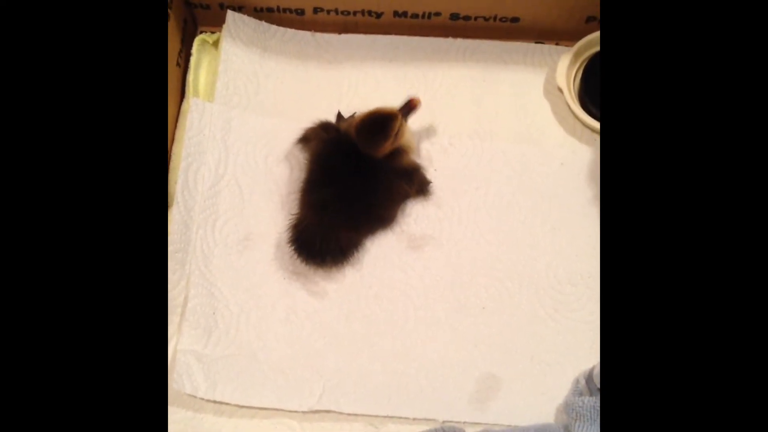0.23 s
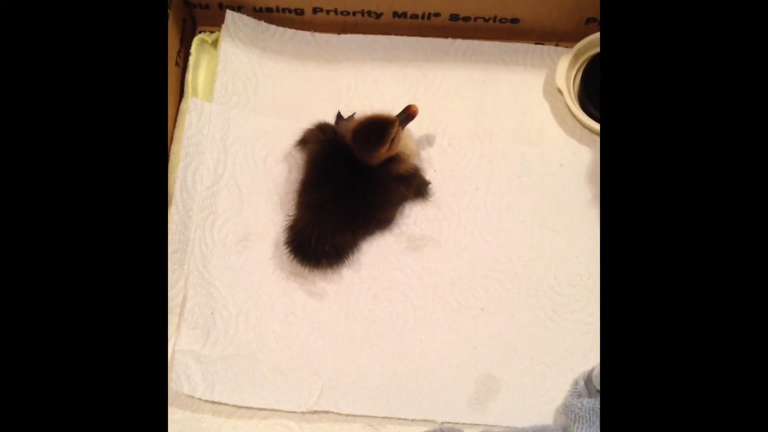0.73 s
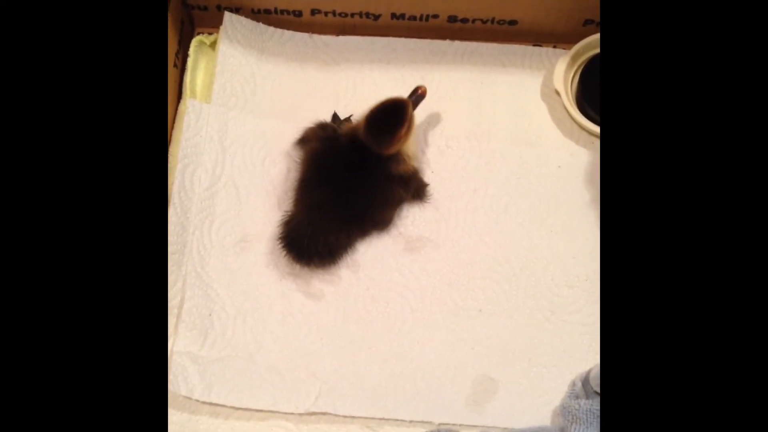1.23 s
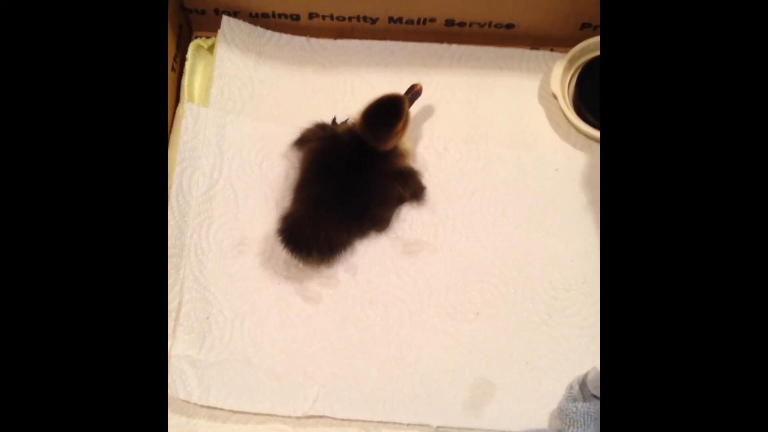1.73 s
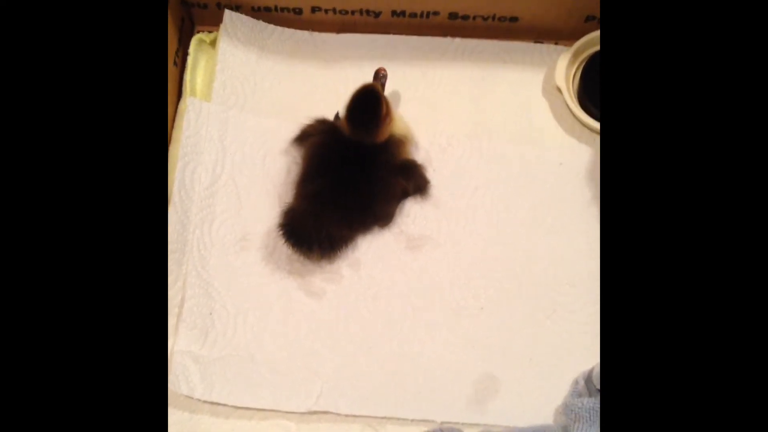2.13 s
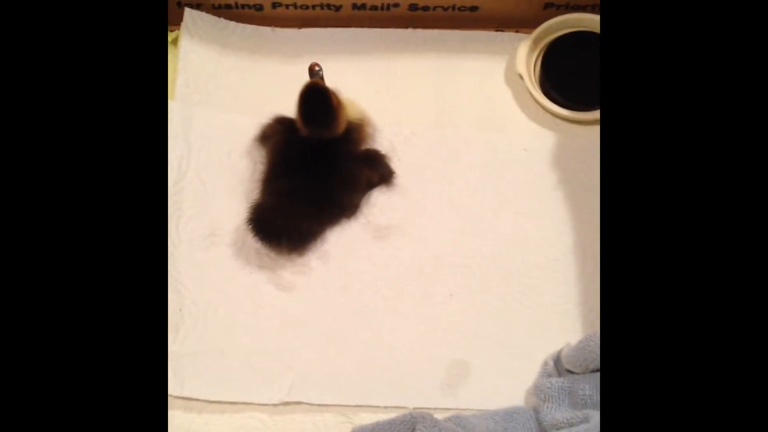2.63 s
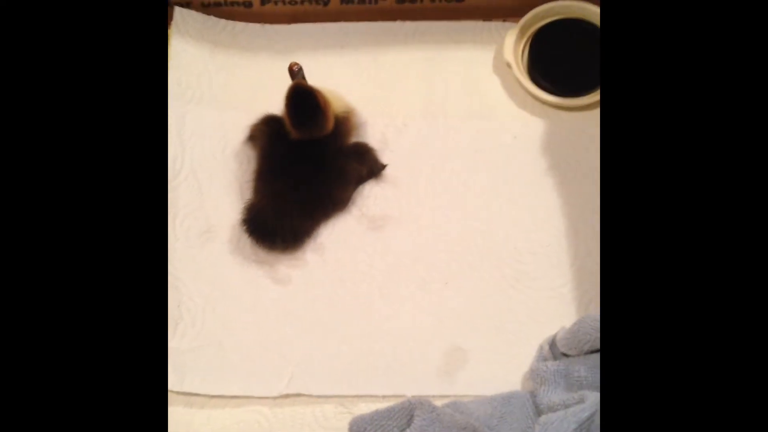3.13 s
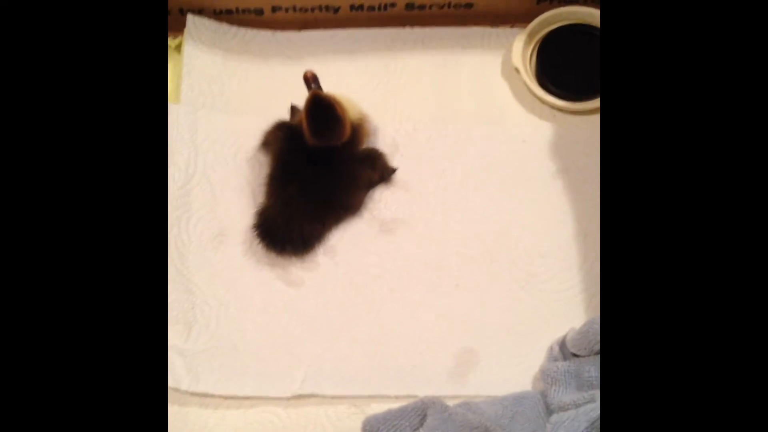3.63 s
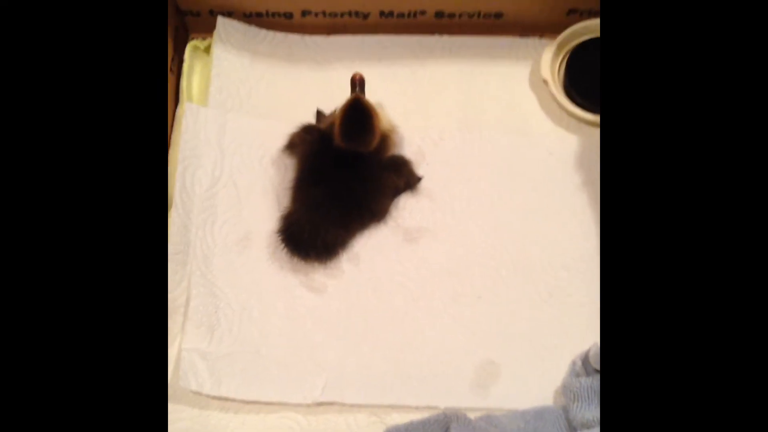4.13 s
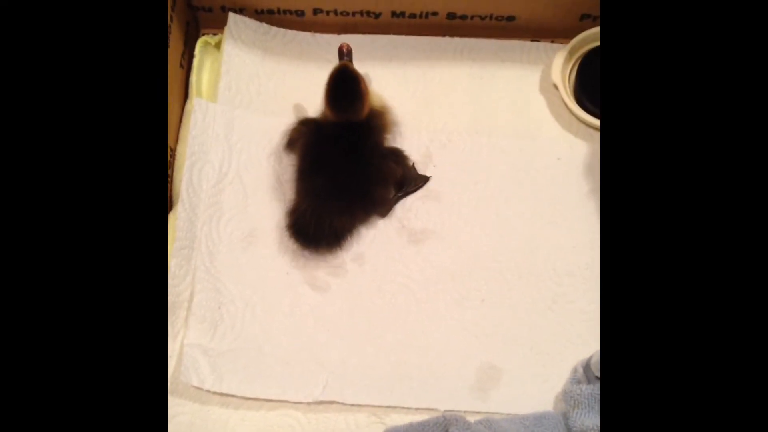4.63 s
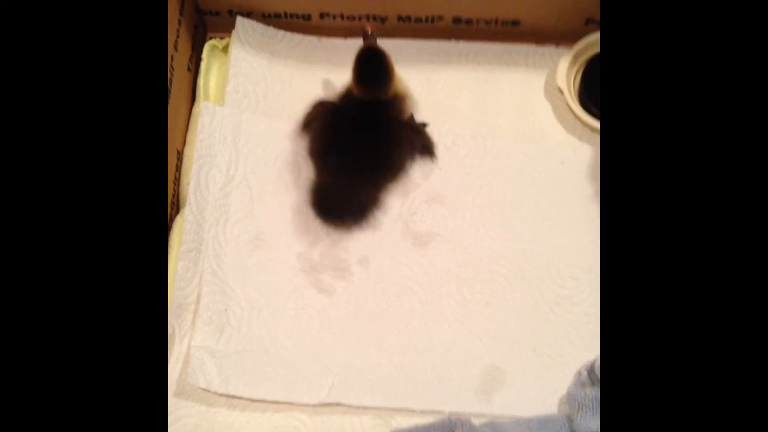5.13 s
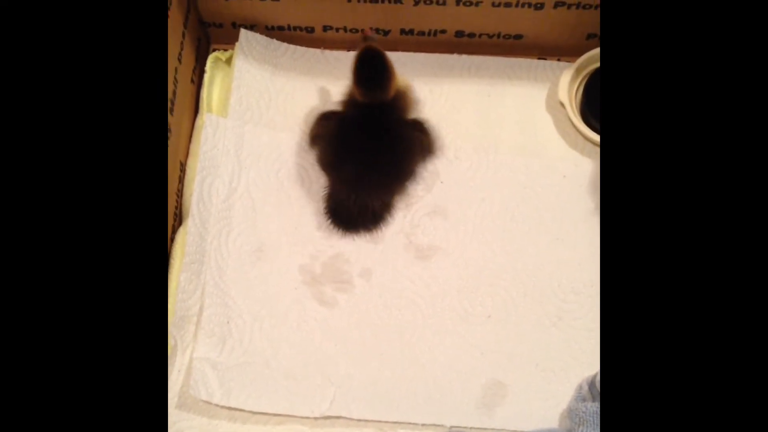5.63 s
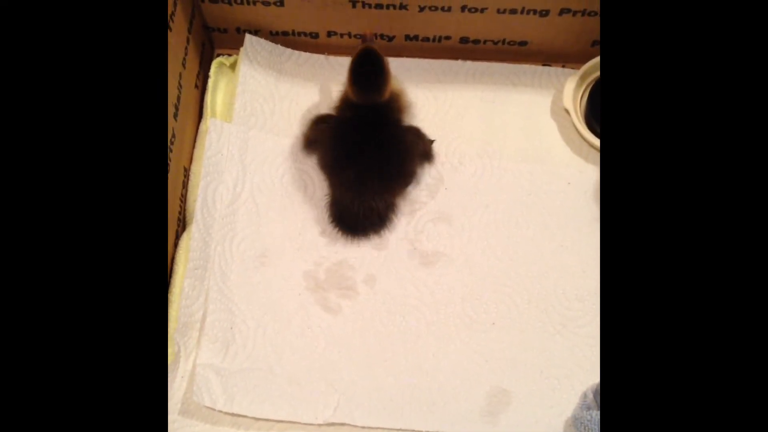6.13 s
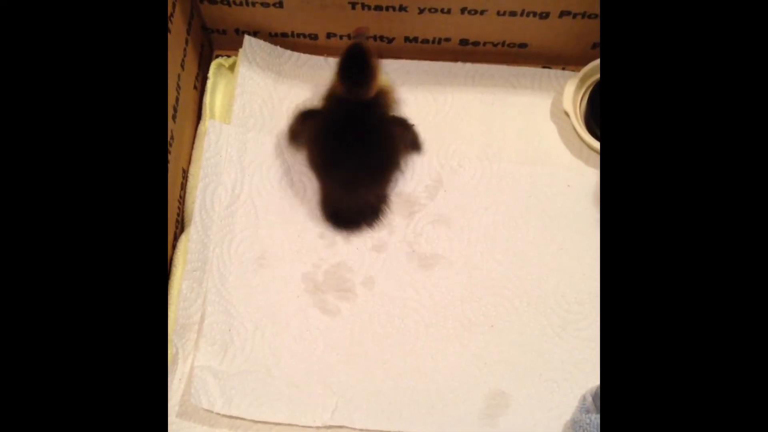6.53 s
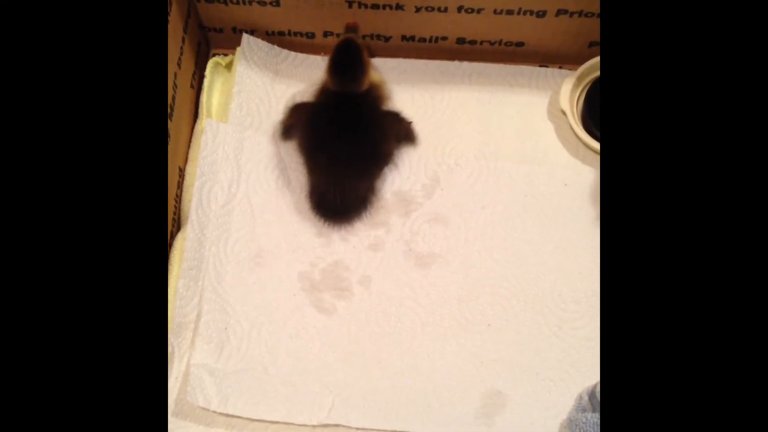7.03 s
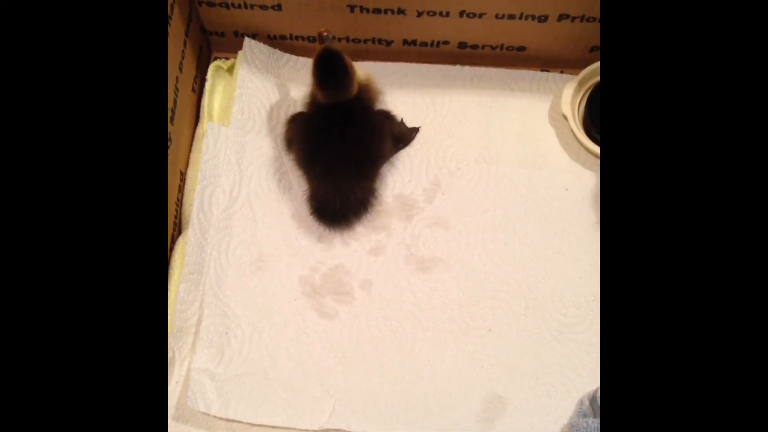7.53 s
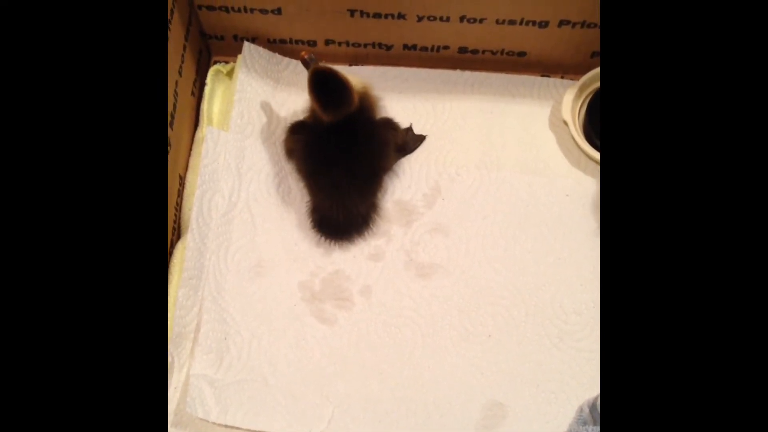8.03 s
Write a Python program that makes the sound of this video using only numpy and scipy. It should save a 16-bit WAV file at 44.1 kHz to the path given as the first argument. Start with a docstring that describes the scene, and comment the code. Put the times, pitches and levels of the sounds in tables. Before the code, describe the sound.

One duckling in a paper-lined box, heard closely from above in a quiet room. It opens with a gritty burst and a pair of fast cheeps, falls silent, then gives a dozen brief, high, pure peeps, many with a double bend in pitch. Light foot scuffs, crisp paper crackles and three small ticks appear mostly in the second half, over faint low hum, rumble and hiss.

```python
"""A quiet room: a duckling peeps in a paper-lined cardboard box, heard from close above.
A harsh rasp of ringing noise grains and two quick cheeps open it; a dozen peeps follow, most with two
pitch humps, all gliding near-pure tones. Scuffs are swells of noise grains, claw ticks short rings.
Echoes and a short tail follow each sound; a beating hum, rumble and faint hiss lie under it."""
import sys
import numpy as np
from scipy import signal
from scipy.fft import rfft, irfft, next_fast_len
from scipy.io import wavfile

SR = 44100
rng = np.random.default_rng(int(sys.argv[2]) if len(sys.argv) > 2 else 0)


def output_pcm(signal):
    """Save a mono or channel-first signal as 16-bit PCM at the path in sys.argv[1].

    Samples are clipped to [-1, 1] before scaling.
    """
    pcm = np.clip(np.atleast_2d(signal).T, -1, 1) * 32767
    wavfile.write(sys.argv[1], SR, np.round(pcm).astype(np.int16))


N = 364707
TIME = np.arange(N) / SR


def from_db(db):
    """Decibels to gain."""
    return 10 ** (np.asarray(db) / 20)


def rms_one(x):
    """Scale to unit rms."""
    return x / np.sqrt(np.mean(x ** 2) + 1e-20)


def drift(rate_hz):
    """Slow unit-rms random curve: noise through a two-pole lowpass at SR / 8, interpolated to SR."""
    pole = np.exp(-16 * np.pi * rate_hz / SR)
    noise = rng.standard_normal(N // 8 + 4002)
    slow = signal.lfilter([1], [1, -2 * pole, pole * pole], noise)[4000:]  # skip the settling
    return np.interp(np.arange(N) / 8, np.arange(len(slow)), rms_one(slow))


def colour(x, spectrum):
    """Filter by a (frequency [Hz], relative level [dB]) outline; white noise keeps its power."""
    size = next_fast_len(N)
    hz, db = np.transpose(spectrum)
    bin_hz = np.maximum(np.arange(size // 2 + 1) * SR / size, 1)
    gain = rms_one(from_db(np.interp(np.log(bin_hz), np.log(hz), db)))
    return irfft(rfft(x, size) * gain, size)[:N]


def resonate(x, hz, width_hz):
    """Two-pole resonance with unit peak gain."""
    pole = np.exp(-np.pi * width_hz / SR)
    zeros = np.array([1, 0, -1]) * (1 - pole * pole) / 2
    return signal.lfilter(zeros, [1, -2 * pole * np.cos(2 * np.pi * hz / SR), pole * pole], x)


def grains(spread_db):
    """Unit-rms white noise in millisecond clumps."""
    return rms_one(rng.standard_normal(N) * from_db(spread_db * drift(300)))


def scattered(start_s, end_s, count):
    """One random moment in each equal share of a stretch of time."""
    return start_s + (end_s - start_s) * (np.arange(count) + rng.random(count)) / count


# room noise outline: (frequency [Hz], relative density [dB per Hz])
ROOM_TONE = [(15, -63), (25, -20), (55, -7.5), (112, -5.5), (147, -6), (198, -8.5), (258, -11.5),
             (288, -11.5), (338, -13), (479, -14.5), (913, -21), (1650, -22.5), (4220, -18), (7020, -20),
             (13700, -21), (15300, -22)]
ROOM_TONE_RMS_DB = -56.5
# soft swells of rumble: (start [s], length [s], level at the top [dB], centre [Hz], width [Hz])
RUMBLE_SWELLS = [(3.15, 0.5, -63, 54, 50), (3.98, 0.69, -66.5, 335, 224)]


def background():
    """Rumble and hiss: coloured white noise, plus two bands that swell as half sines."""
    air = from_db(ROOM_TONE_RMS_DB) * colour(rng.standard_normal(N), ROOM_TONE)
    for start_s, length_s, level_db, hz, width_hz in RUMBLE_SWELLS:
        band = resonate(rng.standard_normal(N), hz, width_hz)
        band = rms_one(resonate(band, hz, width_hz))
        swell = np.sin(np.pi * np.clip((TIME - start_s) / length_s, 0, 1))
        air += from_db(level_db) * swell * band
    return air


# stronger hum tone: (time [s], rms level [dB])
HUM_LEVEL = [(0.0, -76), (2.2, -71), (3.4, -66.5), (6.8, -69.5), (8.27, -73)]
HUM_HZ = 119.6
BEAT_S, BEAT_PEAK_S, SECOND_TONE_DB = 0.894, 3.424, -3.0
# fainter tones beside the hum: (frequency [Hz], rms level [dB])
HUM_LINES = [(96, -78), (193, -78)]


def hum(waver_hz=0.3, line_waver_hz=1.53):
    """Two close low tones beat; fainter wavering tones lie beside them."""
    phase = 2 * np.pi * np.cumsum(HUM_HZ + waver_hz * drift(1.49)) / SR
    slip = 2 * np.pi * (TIME - BEAT_PEAK_S) / BEAT_S
    pair = np.sin(phase) + from_db(SECOND_TONE_DB) * np.sin(phase + slip)
    out = from_db(np.interp(TIME, *np.transpose(HUM_LEVEL))) * pair
    for hz, db in HUM_LINES:
        line_hz = hz + line_waver_hz * drift(3.0)
        out += from_db(db) * np.sin(2 * np.pi * np.cumsum(line_hz) / SR)
    return np.sqrt(2) * out  # sine amplitude from rms


# clearest touches of feet and bill on paper, levels at the top of the swell:
# (start [s], length scale [s], dull scuff [dB], crisp crackle [dB])
SCUFFS = [(1.122, 0.017, -64, -66), (1.96, 0.058, -63.5, -61), (3.594, 0.006, -64, -72),
          (5.035, 0.021, -60.5, -67), (5.11, 0.03, -63, -64), (5.565, 0.013, -61, -74),
          (5.73, 0.005, -55, -72), (5.809, 0.03, -62.5, -67), (6.181, 0.0076, -64, -61),
          (6.432, 0.009, -60, -51.5), (6.454, 0.0054, -66, -49), (6.678, 0.01, -55.5, -64),
          (6.793, 0.015, -56.5, -61), (6.871, 0.012, -61, -51.5), (6.953, 0.02, -53, -65),
          (7.1, 0.022, -64.5, -69), (7.464, 0.011, -64, -56.5), (8.071, 0.0056, -55.5, -58)]
# dull scuff outline: (frequency [Hz], relative density [dB per Hz])
SCUFF_COLOUR = [(500, -13), (1000, -1.5), (1700, 6), (2400, 6), (3600, 2), (6000, -22.5)]
# crisp crackle outline, also the peeps' turbulence: (frequency [Hz], relative density [dB per Hz])
CRACKLE_COLOUR = [(2000, -12), (3800, -1), (5800, 2.5), (7500, -10), (11000, -7), (15000, -9)]
# lighter touches at random while it walks
WALK_FROM_S, WALK_TO_S, WALK_TOUCHES = 5.3, 7.5, 14
TOUCH_S, TOUCH_DULL_DB, TOUCH_CRISP_DB = 0.0094, -62.5, -66


def scuffs():
    """Each touch drags on the paper: a quick swell of grains that dies away."""
    dull, crisp = np.zeros(N), np.zeros(N)
    light_starts = scattered(WALK_FROM_S, WALK_TO_S, WALK_TOUCHES)
    light = [(start_s, TOUCH_S, TOUCH_DULL_DB, TOUCH_CRISP_DB) for start_s in light_starts]
    for start_s, length_s, dull_db, crisp_db in SCUFFS + light:
        span = slice(int(start_s * SR), min(int((start_s + 4 * length_s) * SR), N))
        age = np.maximum(TIME[span] - start_s, 0) / (0.54 * length_s)
        swell = age * np.exp(1 - age)  # peaks at 1
        dull[span] += from_db(dull_db) * swell
        crisp[span] += from_db(crisp_db) * swell
    scuff = colour(dull * grains(spread_db=3.2), SCUFF_COLOUR)
    crackle = colour(crisp * grains(spread_db=4.5), CRACKLE_COLOUR)
    return scuff + crackle


# sharp ticks of a claw on paper: (time [s], peak level [dB])
TICKS = [(6.4464, -33.5), (7.305, -40), (8.0745, -37)]


def ticks(hz=5200, width_hz=3500, knock_hz=1900, knock_width_hz=900, knock_db=-4.0):
    """Each click rings the paper, and the cardboard under it, very briefly."""
    impulse = signal.unit_impulse(SR // 100)
    paper = resonate(impulse, hz, width_hz)
    cardboard = from_db(knock_db) * resonate(impulse, knock_hz, knock_width_hz)
    ring = paper + cardboard
    clicks = np.zeros(N)
    for start_s, peak_db in TICKS:
        clicks[int(start_s * SR)] = from_db(peak_db)
    return signal.fftconvolve(clicks, ring / np.abs(ring).max())[:N]


# opening rasp before its fade and filters: (time [s], level [dB])
RASP_LEVEL = [(0.0, -28), (0.014, -32.5), (0.042, -32), (0.094, -36), (0.105, -32)]
RASP_END_S, RASP_FADE_S = 0.09, 0.029  # exponential fade from the end
# rasp noise outline: (frequency [Hz], relative density [dB per Hz])
RASP_COLOUR = [(1400, -31), (2100, -8.5), (2600, -7), (3200, 1), (3800, -1.5), (4300, -2), (5500, -7),
               (6500, -8), (8000, -17), (10000, -22), (13000, -34)]
# resonances ringing in the rasp: (centre [Hz], width [Hz], relative level [dB])
RASP_MODES = [(2325, 63, -12.5), (2860, 60, -17), (3150, 78, 0.5), (3700, 39, 0.5), (4610, 39, -12),
              (4740, 39, -18), (6400, 21, -10.5)]


def rasp(noise_db=-0.5, low_hz=1950, top_hz=9000):
    """A harsh, pitchless burst: uneven grains ring a few resonances and die under the first cheep."""
    source = grains(spread_db=2.5)
    ringing = sum(from_db(db) * rms_one(resonate(source, hz, width_hz))
                  for hz, width_hz, db in RASP_MODES)
    noise = from_db(noise_db) * colour(grains(spread_db=2.5), RASP_COLOUR)
    level = from_db(np.interp(TIME, *np.transpose(RASP_LEVEL)))
    fade = np.exp(-np.maximum(TIME - RASP_END_S, 0) / RASP_FADE_S)
    burst = level * fade * rms_one(noise + ringing)
    burst = signal.sosfilt(signal.butter(4, top_hz, fs=SR, output="sos"), burst)
    return signal.sosfilt(signal.butter(6, low_hz, "high", fs=SR, output="sos"), burst)


def glide(t, times_s, pitches_hz):
    """Pitch eases between its turning points and moves steeply at both ends of a call."""
    place = np.interp(t, times_s, np.arange(len(times_s)))
    last = len(times_s) - 2
    leg = np.minimum(place.astype(int), last)
    u = place - leg
    middle = (1 - np.cos(np.pi * u)) / 2
    eased = np.select([leg == 0, leg == last], [1 - (1 - u) ** 2, u ** 2], middle)
    return np.array(pitches_hz)[leg] + np.diff(pitches_hz)[leg] * eased


# (start [s], length [s], time to second hump [s], first hump [Hz], dip [Hz], second hump [Hz],
#  level at dip [dB], level at second hump before the pinch [dB], octave level at dip [dB])
PEEPS = [(0.098, 0.055, 0.037, 3050, 3290, 3550, -31, -30.5, -39.5),
         (0.188, 0.052, 0.041, 3520, 3660, 4050, -36.5, -32.5, -39.5),
         (2.905, 0.052, 0.045, 3750, 3330, 3520, -32.5, -34.5, -53.5),
         (3.403, 0.06, 0.047, 3480, 3260, 3940, -32, -35, -49.5),
         (3.926, 0.062, 0.047, 3560, 3250, 3900, -32.5, -35, -49.5),
         (4.407, 0.057, 0.048, 3480, 3350, 3640, -35, -33.5, -51),
         (4.837, 0.064, 0.05, 3360, 3200, 3860, -46.5, -37, -43.5),
         (5.347, 0.069, 0.046, 3700, 3640, 3970, -41, -37.5, -42),
         (5.803, 0.065, 0.046, 3620, 3440, 3980, -34.5, -36, -41.5),
         (6.291, 0.077, 0.044, 3260, 3570, 3710, -37, -35, -45.5),
         (6.934, 0.067, 0.043, 3470, 3410, 3740, -32.5, -34.5, -57),
         (7.376, 0.069, 0.051, 3980, 3770, 3980, -33, -36, -50.5),
         (7.78, 0.065, 0.05, 3850, 3700, 4310, -37.5, -35, -46.5),
         (8.107, 0.071, 0.056, 3920, 3630, 4490, -35, -33.5, -46.5)]
FIRST_HUMP_SHARE, DIP_SHARE = 0.257, 0.62  # of the time to the second hump
ONSET_HZ, END_HZ = 3010, 2676
ATTACK_S, RELEASE_S = 0.0036, 0.0052
PINCH_DB_PER_HZ = -0.0057  # the whistle thins as it is pushed above the dip


def peeps(jitter=0.0023, shimmer_db=1.03, onset_db=-6.5, end_db=-2.5,
          octave_onset_db=-10.0, octave_top_db=-4.5, octave_end_db=-14.0,
          third_db=-65.0, fourth_re_third_db=-5.0, airy_db=-66.0):
    """A near-pure syrinx whistle: pitch usually climbs, dips, climbs again, then drops away."""
    out = np.zeros(N)
    waver = 1 + jitter * drift(250)
    flutter = from_db(shimmer_db * drift(140))
    air = colour(grains(spread_db=4.0), CRACKLE_COLOUR)
    for start_s, length_s, top_s, first_hz, dip_hz, second_hz, early_db, late_db, octave_db in PEEPS:
        span = slice(int(start_s * SR), min(int((start_s + length_s) * SR), N))
        t = TIME[span] - start_s
        first_s, dip_s = FIRST_HUMP_SHARE * top_s, DIP_SHARE * top_s
        pitch = glide(t, [0, first_s, dip_s, top_s, length_s],
                      [ONSET_HZ, first_hz, dip_hz, second_hz, END_HZ])
        phase = 2 * np.pi * np.cumsum(pitch * waver[span]) / SR

        stages_s = [0, dip_s, top_s, length_s]
        tone_db = np.interp(t, stages_s, [early_db + onset_db, early_db, late_db, late_db + end_db])
        tone = from_db(tone_db + PINCH_DB_PER_HZ * (pitch - dip_hz)) * np.sin(phase)
        octave_shape_db = np.interp(t, stages_s, [octave_onset_db, 0, octave_top_db, octave_end_db])
        octave = from_db(octave_db + octave_shape_db) * np.sin(2 * phase)

        # pressed hardest at the highest pitch: upper harmonics and turbulence come out
        press = (pitch / pitch.max()) ** 4
        harmonics = np.sin(3 * phase) + from_db(fourth_re_third_db) * np.sin(4 * phase)
        upper = press * from_db(third_db) * harmonics
        turbulence = press * from_db(airy_db) * air[span]

        gate = np.clip(np.minimum(t / ATTACK_S, (length_s - t) / RELEASE_S), 0, 1)
        voice = tone + octave + upper + turbulence
        out[span] += np.sqrt(2) * gate * flutter[span] * voice
    return out


# echoes off the box and nearby surfaces: (delay [s], level [dB])
ECHOES = [(.0022, -26), (.0044, -17.5), (.0078, -17), (0.011, -17), (.0142, -43), (0.0214, -30)]
# outline of what the room gives back: (frequency [Hz], relative level [dB])
TAIL_COLOUR = [(1000, -3.5), (2600, 0), (3200, -4.5), (3850, 0.5), (4400, 2.5), (7000, -9), (14000, -9)]
# sound sent into the room as the duckling turns and walks off: (time [s], level [dB])
SPILL = [(0.2, -4.5), (3.0, -2.5), (5.3, 3), (8.1, 1.5)]


def room(x, tail_db=-23.5, t60_s=0.32, gap_s=0.01):
    """Direct sound and close echoes, then a short diffuse tail of decaying noise."""
    t = TIME[:SR // 2]
    decay = np.exp(-np.log(1000) * t / t60_s)
    tail = rng.standard_normal(len(t)) * decay * np.clip(t / gap_s - 1, 0, 1)
    tail *= from_db(tail_db) / np.sqrt(np.sum(tail ** 2))
    spilt = colour(x * from_db(np.interp(TIME, *np.transpose(SPILL))), TAIL_COLOUR)
    close = signal.unit_impulse(len(t))
    for delay_s, db in ECHOES:
        close[int(delay_s * SR)] += from_db(db)
    return signal.fftconvolve(x, close)[:N] + signal.fftconvolve(spilt, tail)[:N]


def scene():
    """Everything reaches one microphone, alike in both channels."""
    duckling = peeps() + rasp() + scuffs() + ticks()
    mono = room(duckling) + background() + hum()
    return np.stack([mono, mono])


CUTOFF_HZ = 15350


def record(dry):
    """A steep elliptic lowpass cuts the top."""
    lowpass = signal.ellip(12, 0.1, 80, CUTOFF_HZ, fs=SR, output="sos")
    return signal.sosfilt(lowpass, dry)


dry = scene()
out = record(dry)
output_pcm(out)
```